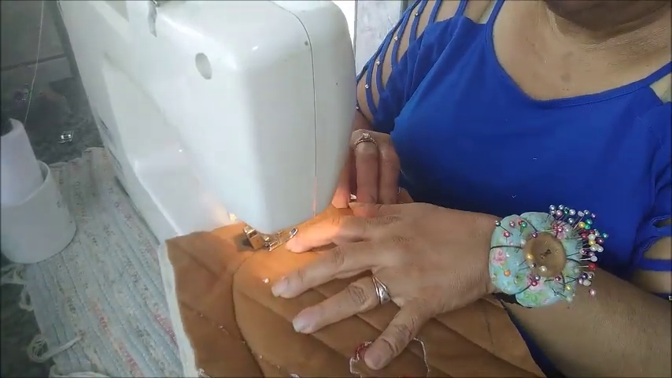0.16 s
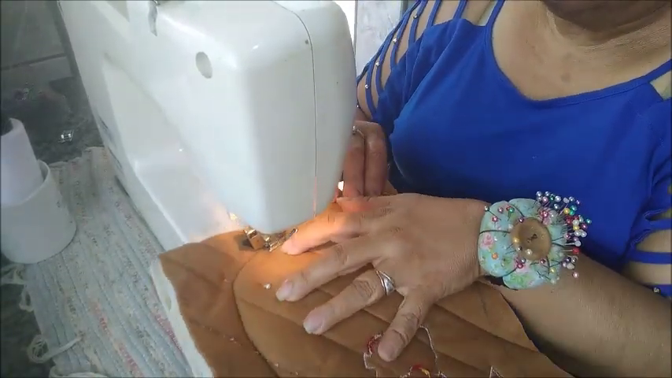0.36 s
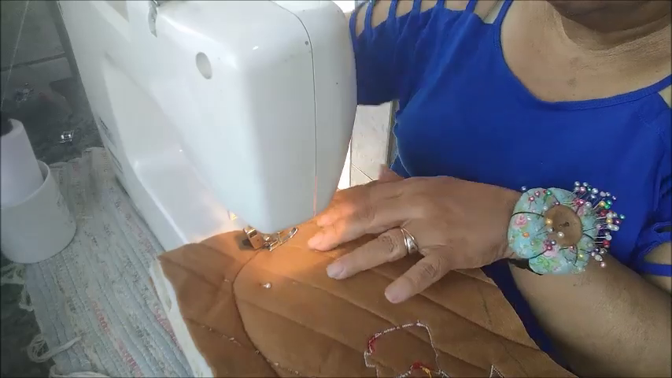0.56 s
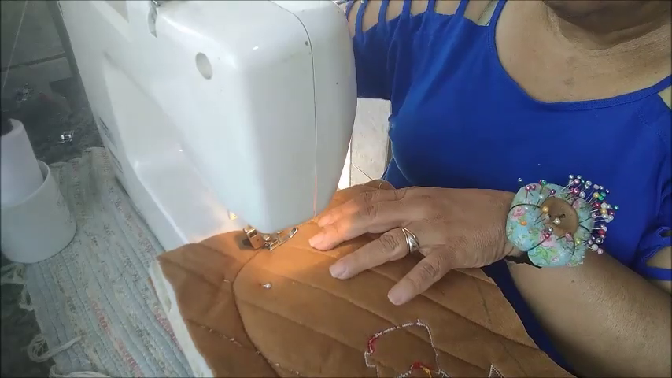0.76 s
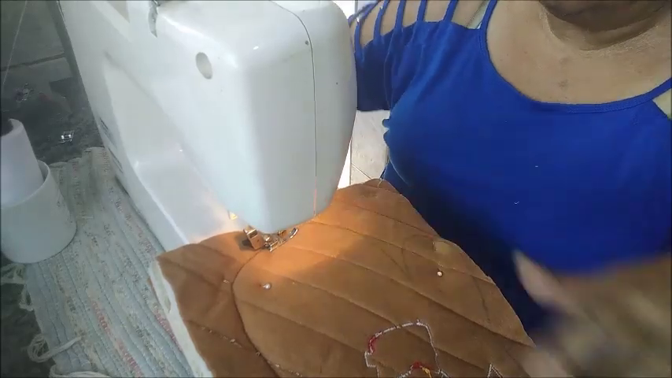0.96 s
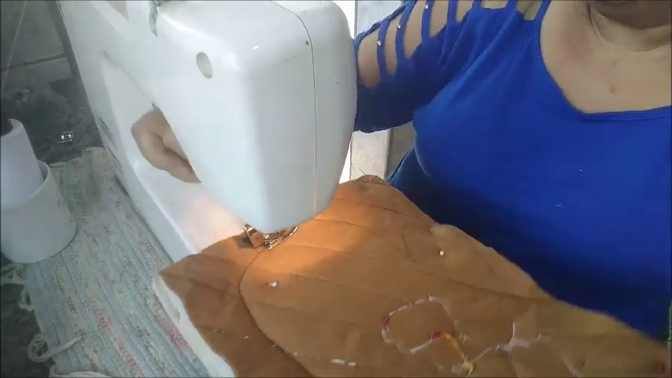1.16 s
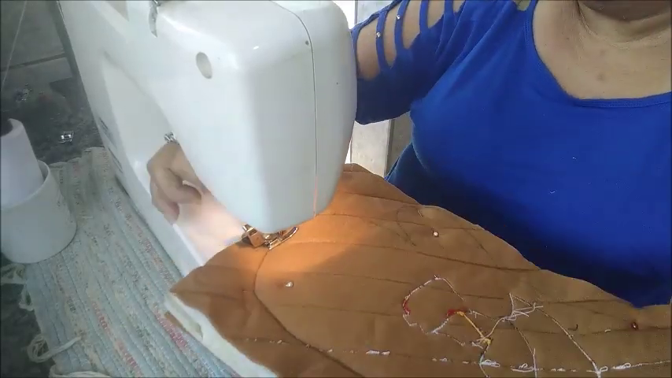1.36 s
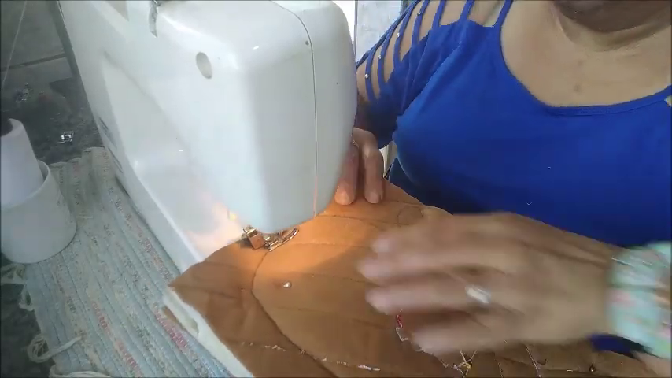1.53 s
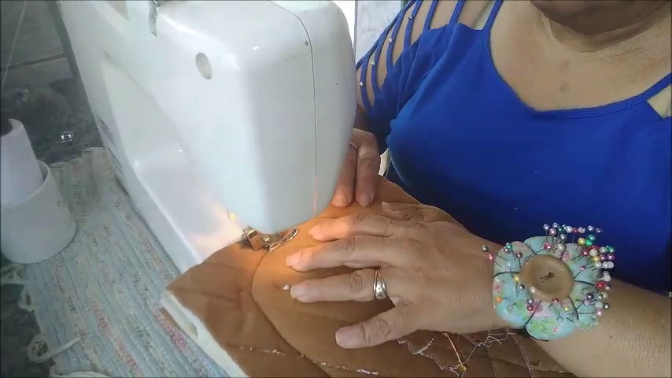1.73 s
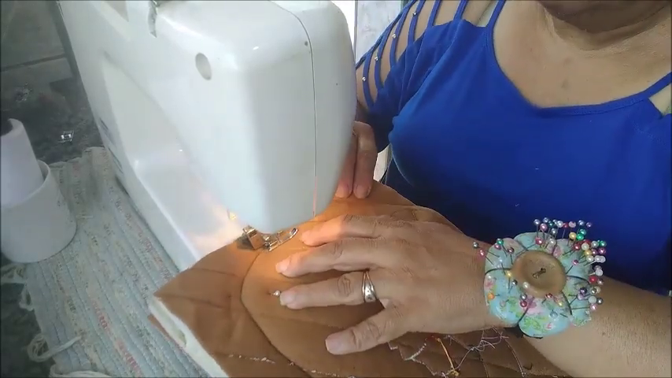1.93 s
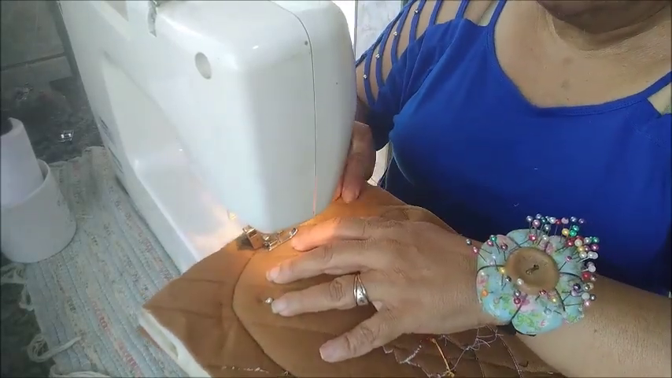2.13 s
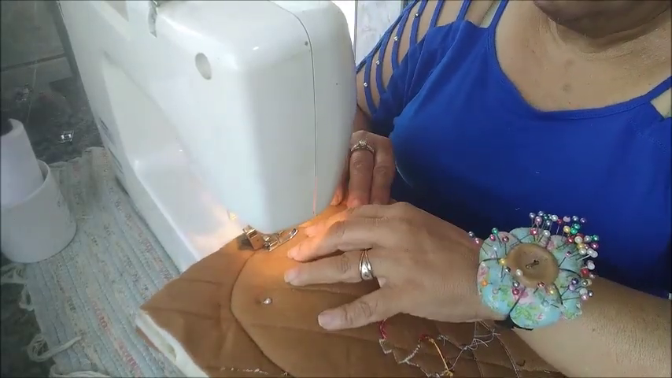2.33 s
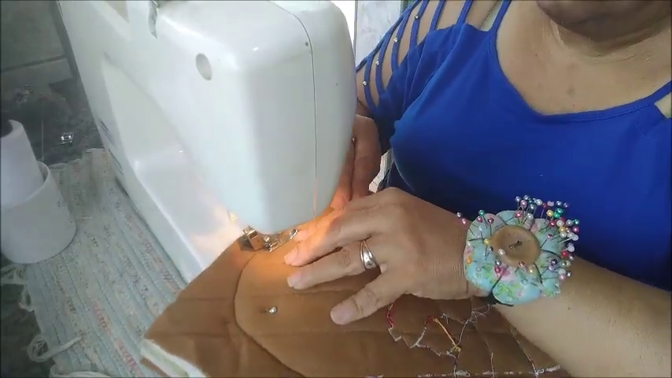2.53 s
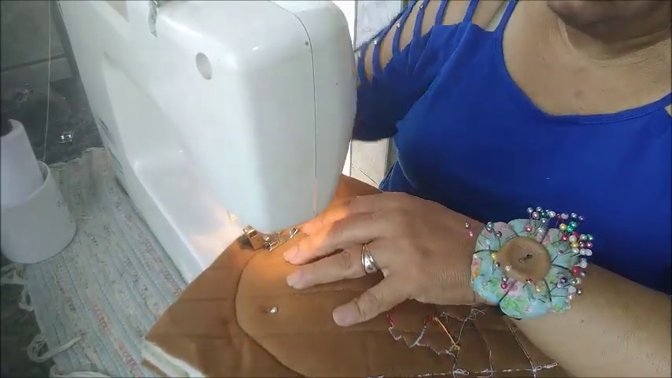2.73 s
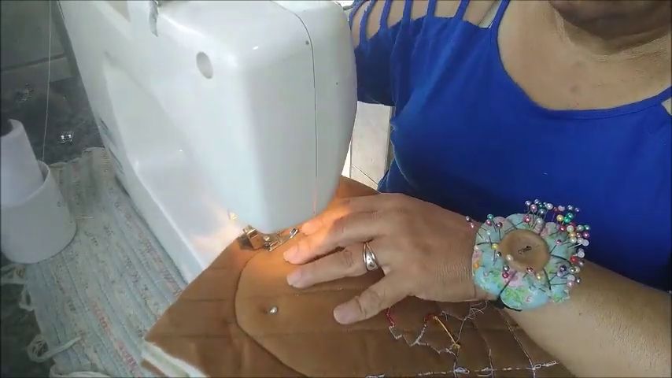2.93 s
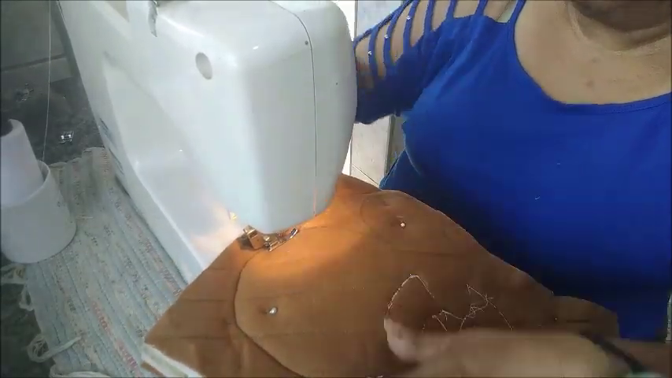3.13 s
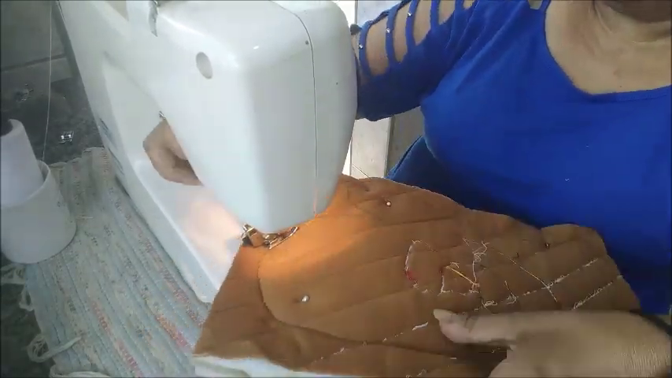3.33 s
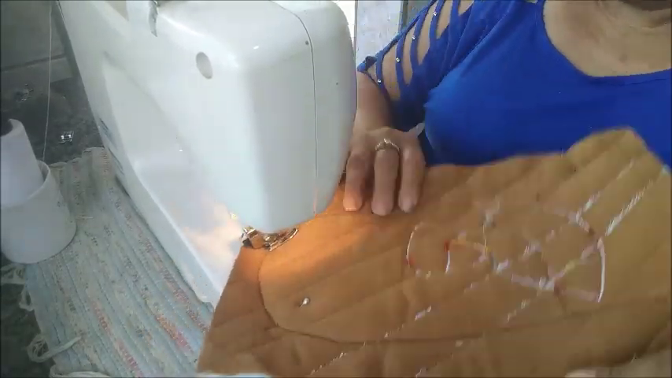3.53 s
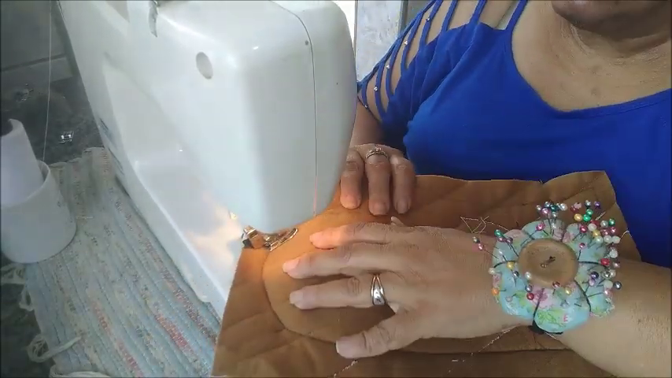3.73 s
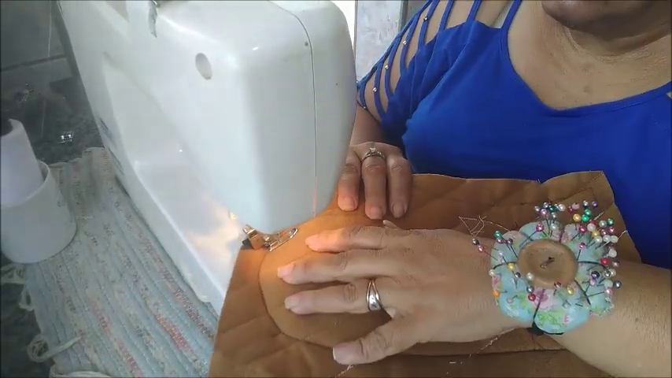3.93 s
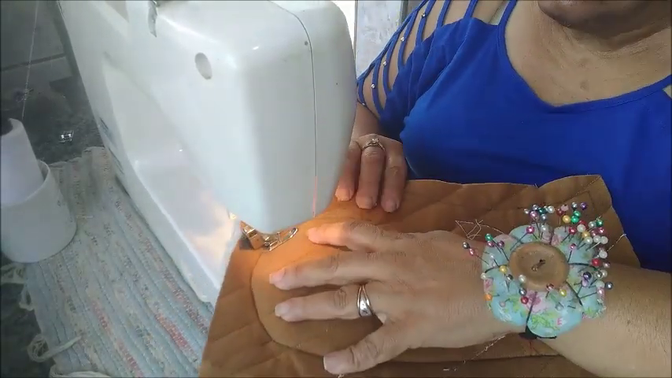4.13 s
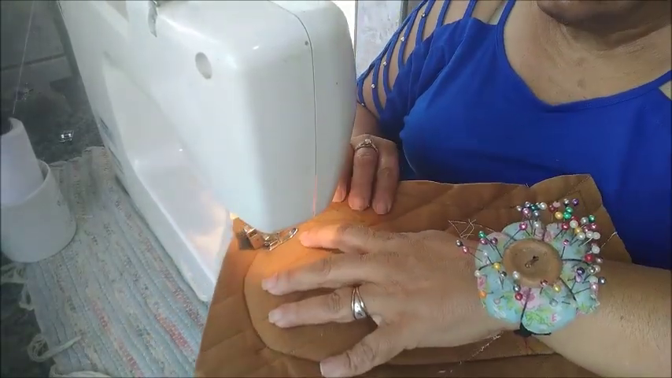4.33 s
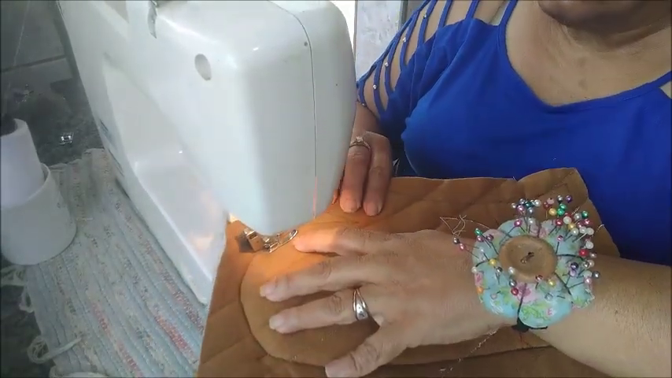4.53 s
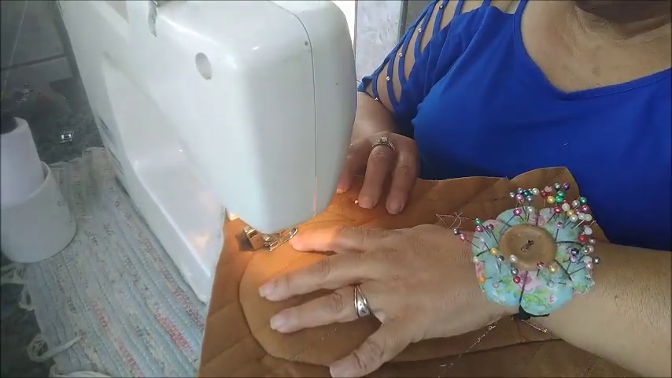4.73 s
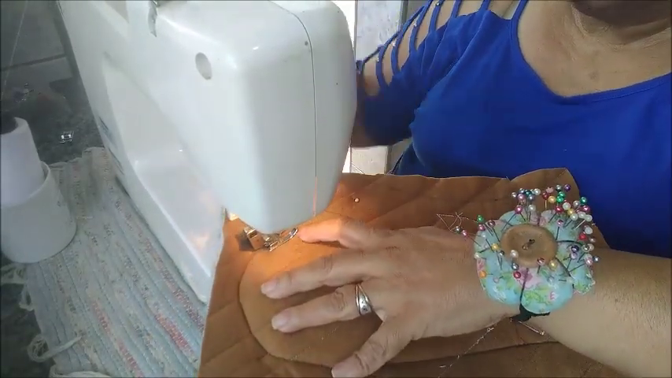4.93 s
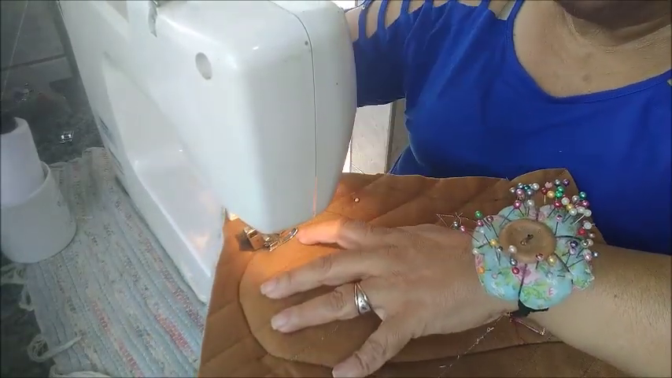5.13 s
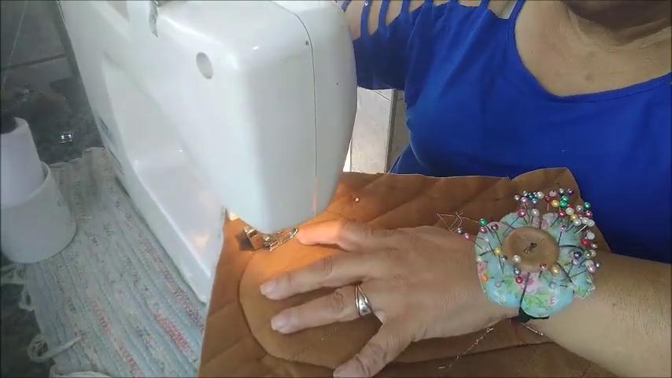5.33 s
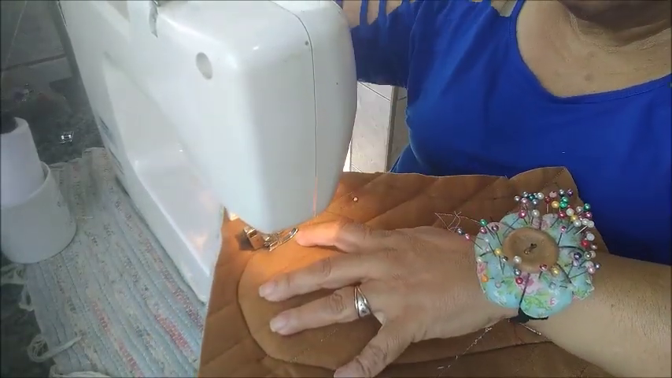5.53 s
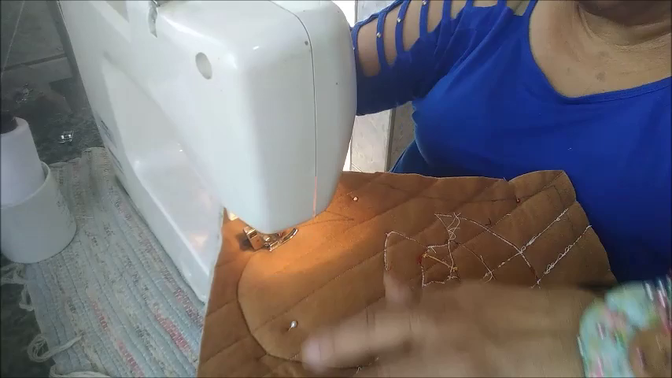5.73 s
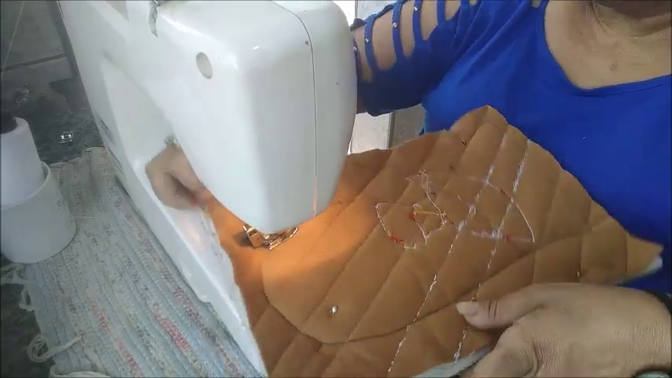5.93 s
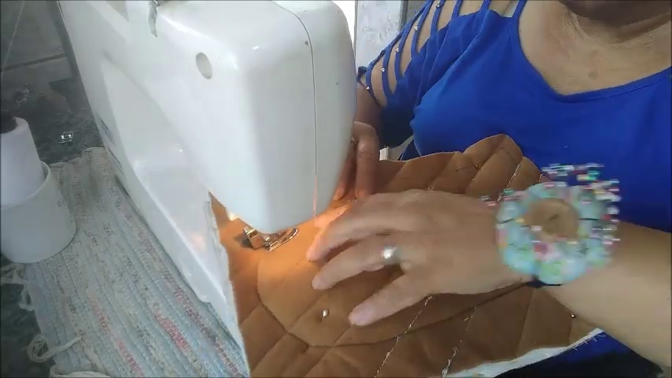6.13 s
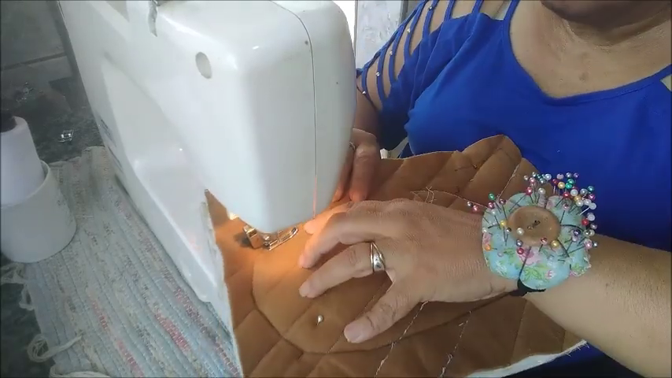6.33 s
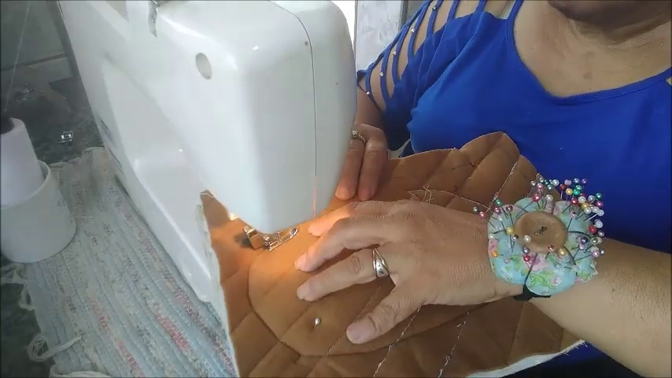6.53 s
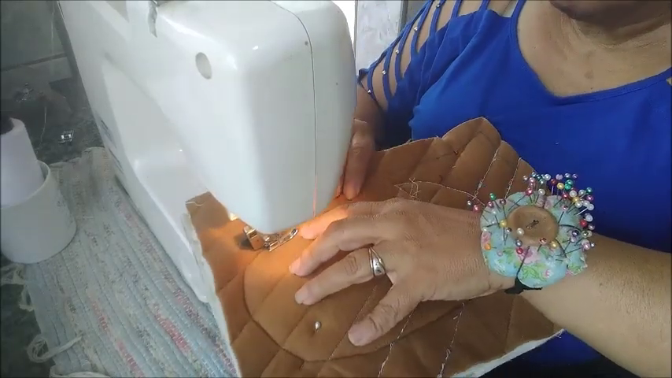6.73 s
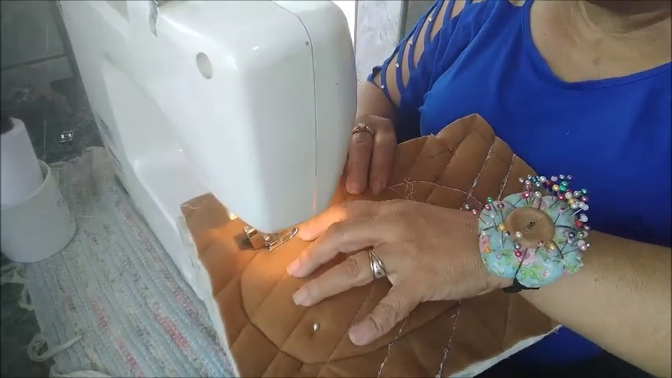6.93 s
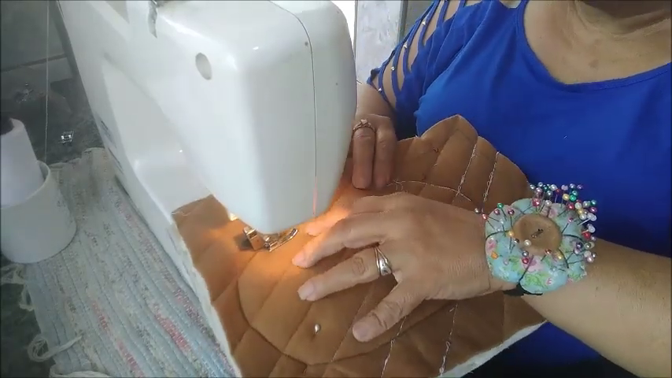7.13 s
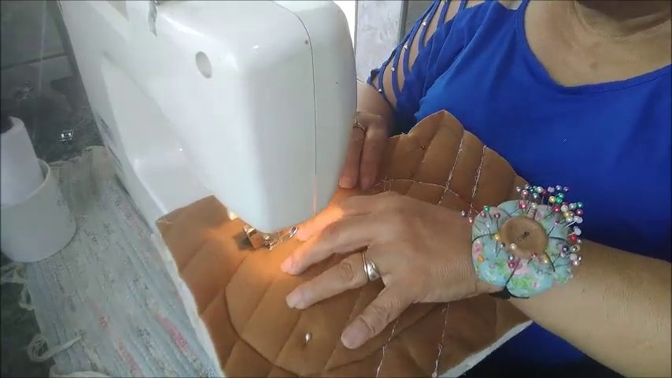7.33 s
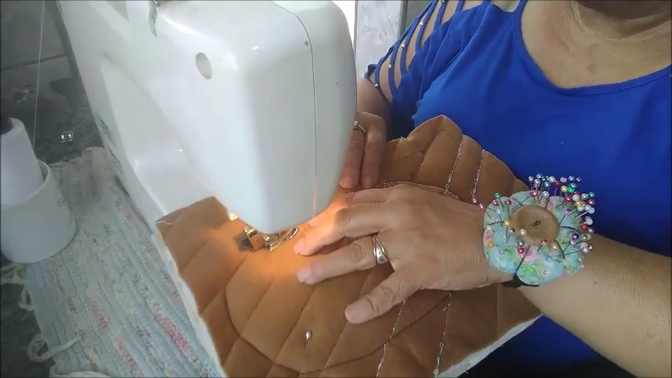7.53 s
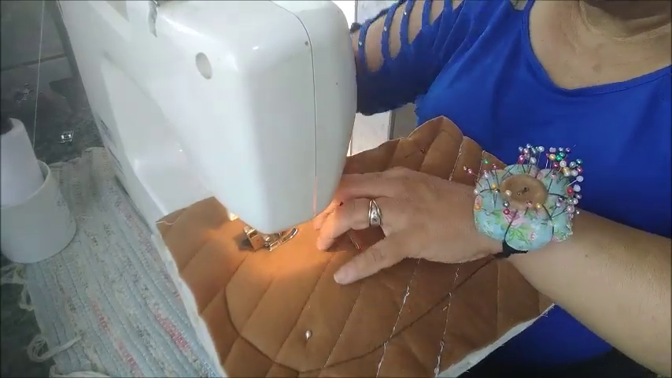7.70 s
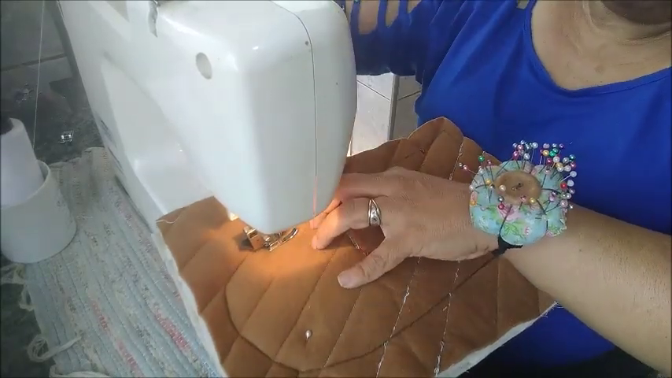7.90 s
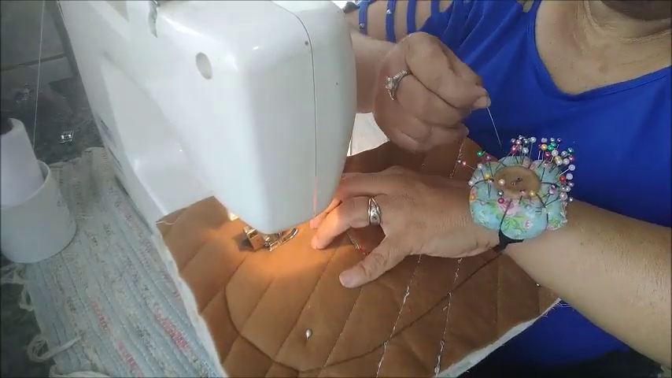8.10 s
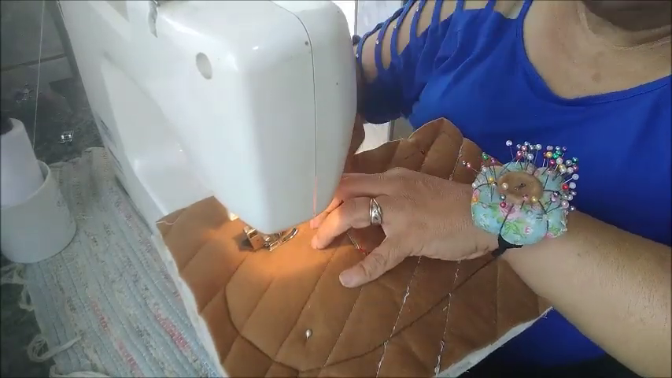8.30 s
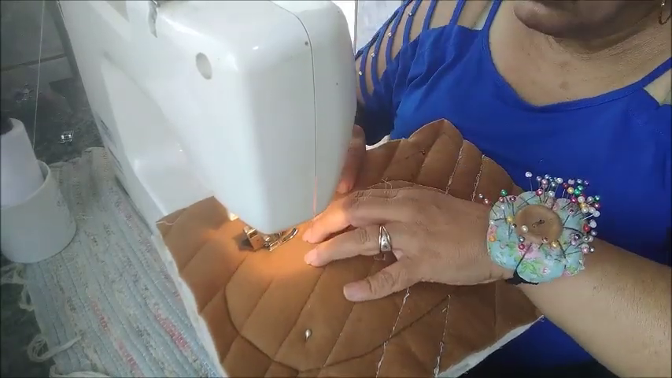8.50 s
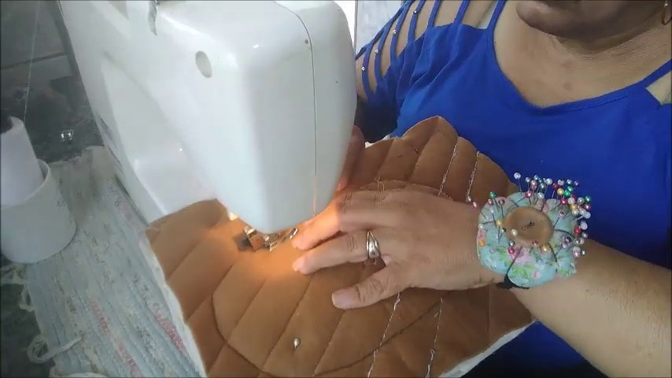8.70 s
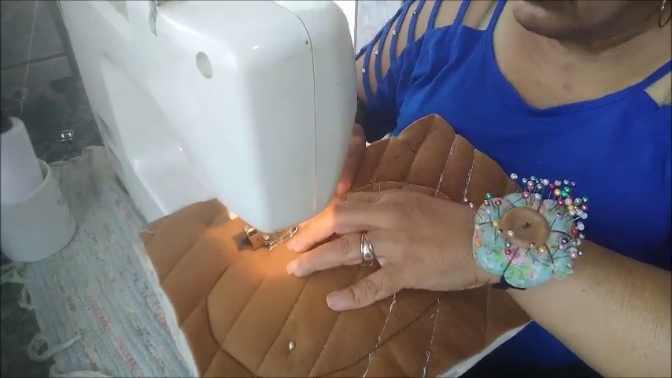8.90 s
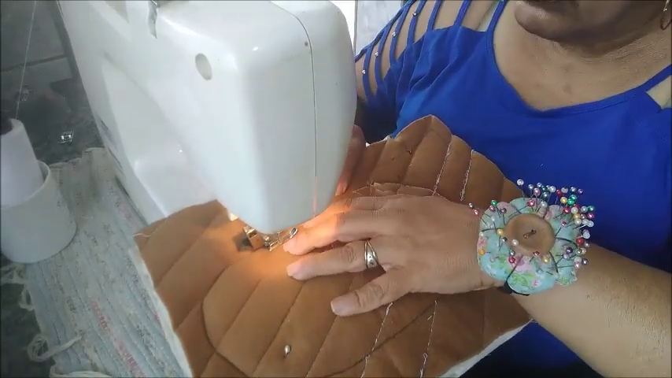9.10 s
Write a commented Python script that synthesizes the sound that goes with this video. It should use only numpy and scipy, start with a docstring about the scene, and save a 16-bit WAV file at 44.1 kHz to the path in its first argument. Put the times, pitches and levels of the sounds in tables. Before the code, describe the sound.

A sewing machine rattles in short, hard bursts through thick quilted fabric, with clicks, soft bumps and cloth rustles between, over faint room hum.

```python
"""A sewing machine on a table stitches a quilt in short bursts, close to a phone.
Room murmur (shaped noise) and thin whines (wavering sines) run throughout; a far low drone sounds until 1.15 s.
One burst at 0.3 s, then groups from 1.8, 3.8, 6.3 and 8.6 s: contact noise and clacks ring housing and table.
Clicks (ticks and ringing knocks) follow the first bursts and return around 5 s; soft bumps ring the table.
Cloth rustles and swishes with faint squeaks (shaped noise, rough tones), mostly between groups from 3.1 s on."""
import sys
import numpy as np
from scipy import signal
from scipy.fft import rfft, irfft, next_fast_len
from scipy.io import wavfile
from scipy.ndimage import uniform_filter1d

SR = 44100
rng = np.random.default_rng(int(sys.argv[2]) if len(sys.argv) > 2 else 0)


def generate_wav(signal):
    """Clip the signal to [-1, 1] and save it as 16-bit WAV at the path in sys.argv[1]."""
    frames = np.transpose(np.atleast_2d(signal))
    scaled = np.clip(frames, -1, 1) * 32767
    pcm = np.round(scaled).astype(np.int16)
    wavfile.write(sys.argv[1], SR, pcm)


N = 403955
T = np.arange(N) / SR

# Pedal presses. Each row: start [s], held [s], stops dead after [s], relative rattle at the start [dB],
# relative rattle at running speed [dB], relative table shake [dB], time of one needle stroke [s].
BURSTS = [(.272, 0.096, 0.2, -45.5, -30, -11.5, .369), (1.772, 0.114, 0.18, -41.5, -32.5, -1.5, 1.785),
          (2.039, 0.1206, 0.215, -46.5, -32, -4, 2.133), (2.362, 0.18, 0.23, -54, -31, -8.5, 2.491),
          (3.847, 0.026, 0.035, -52.5, -41.5, 3, 3.85), (3.961, 0.089, 0.17, -45, -30.5, -1, 4.021),
          (4.199, 0.1, 0.21, -46.5, -30, -4.5, 4.235), (4.488, 0.1, 0.16, -43, -31, -3.5, 4.551),
          (6.324, 0.091, 0.16, -47, -29, -4, 6.416), (6.664, .09, 0.15, -41, -32, -6, 6.743),
          (6.931, 0.1, 0.17, -53.5, -30.5, -8, 7.025), (7.191, 0.14, 0.22, -45.5, -30, -7.5, 7.286),
          (8.586, 0.12, 0.22, -45, -30.5, -4.5, 8.672), (8.882, 0.12, 0.19, -46, -30.5, -5, 8.945)]
# Housing panel resonances. Each row: frequency [Hz], width [Hz], relative level [dB].
HOUSING_MODES = [(955, 69, -5.5), (1103, 32.5, -1), (1304.5, 39.3, 1), (1455, 29, -0.5), (1556, 70, 0.5),
                 (1680, 105, -3.5), (2460, 60, -5), (2600, 74, -7), (3135, 270, -5), (3725, 237, -4.5),
                 (3975, 95, -3.5), (4356, 140, -8), (744.5, 34, -12.5)]
# Table resonances. Each row: frequency [Hz], width [Hz], relative level [dB].
TABLE_MODES = [(192, 70, -8.5), (229, 25, 3), (267.5, 62, -0.5), (353, 59.4, 4), (410, 43, 5),
               (470, 60.6, 4)]
# Spectrum of the gear hiss. Each row: frequency [Hz], relative density [dB per Hz].
GEAR_SPECTRUM = [(350, -51), (600, -18), (823, -26.5), (1080, -12.5), (1530, -26.5), (1830, -7.5),
                 (3730, -8.5), (16000, -20.5)]


def undb(db):
    """Decibels to amplitude factor."""
    return 10 ** (np.asarray(db) / 20)


def level(x, db):
    """Scale to an RMS level, taken over all channels."""
    return x * undb(db) / np.sqrt(np.mean(x ** 2))


def noise():
    """Two independent channels of white noise."""
    return rng.standard_normal((2, N))


def highpass(x, order, cut_hz):
    """Butterworth high-pass."""
    return signal.sosfilt(signal.butter(order, cut_hz, "high", fs=SR, output="sos"), x)


def play(rows, column, rest=-120.):
    """One column of a table interpolated over time, at the rest value outside it."""
    rows = np.array(rows)
    out = np.full(N, rest)
    on = (T >= rows[0, 0]) & (T <= rows[-1, 0])
    out[on] = np.interp(T[on], rows[:, 0], rows[:, column])
    return out


def colour(x, points):
    """Shape the spectrum by (Hz, dB) points, linear in log frequency."""
    hz, db = np.transpose(points)
    size = next_fast_len(N)
    log_hz = np.log(np.arange(size // 2 + 1) * SR / size + 1)
    gain = undb(np.interp(log_hz, np.log(hz), db))
    return irfft(rfft(x, size) * gain, size)[..., :N]


def ring(x, modes):
    """Parallel two-pole resonances of alternating sign; rows of Hz, width in Hz, dB."""
    out = 0
    for k, (hz, width_hz, db) in enumerate(modes):
        r = np.exp(-np.pi * width_hz / SR)
        angle = 2 * np.pi * hz / SR
        gain = (-1) ** k * undb(db) * (1 - r) * np.sin(angle)
        out = out + gain * signal.lfilter([1], [1, -2 * r * np.cos(angle), r * r], x)
    return out


def smear(x, ms):
    """Give each impulse an exponential tail."""
    return signal.lfilter([1], [1, -np.exp(-1000 / (ms * SR))], x)


def walk(rate_hz):
    """Random levels joined by ramps, one new level every 1 / rate_hz seconds."""
    k = int(SR / rate_hz)
    return uniform_filter1d(np.repeat(rng.standard_normal(N // k + 1), k), k)[:N]


def blows(rows, db):
    """Impulses of the given levels at the times in the first column."""
    x = np.zeros(N)
    x[(np.array(rows)[:, 0] * SR).astype(int)] = undb(db)
    return x


def pair(mid, side):
    """Left and right from a centre and an unrelated side signal that grows with pitch."""
    # Each row: frequency [Hz], side minus mid [dB].
    width = [(40, -24), (200, -12.5), (700, -11), (1290, -15), (2380, -8), (4400, -2.5), (8120, 0)]
    return mid + colour(side, width) * np.array([[1], [-1]])


def room():
    """Air and far traffic; low and high air swell separately and the low murmur comes in lumps."""
    # Air spectrum. Each row: frequency [Hz], relative density [dB per Hz].
    air_spectrum = [(25, -39), (150, -52), (300, -21), (480, -16), (1250, -18), (1750, -17.5), (2000, -17),
                    (2600, -19.5), (3300, -23), (4900, -31), (16000, -41)]
    # Narrow bands in the air. Each row: frequency [Hz], width [Hz], relative level [dB].
    air_modes = [(1175, 30, -1), (1945, 35, 0), (1992, 30, 1), (2212, 25, -5), (3240, 90, -9)]
    # Resonances of the murmur. Each row: frequency [Hz], width [Hz], relative level [dB].
    murmur_modes = [(250, 48, -3.5), (370, 34.3, 5), (419.3, 60, 3.5), (451.8, 33, 7)]
    air = level(colour(noise(), air_spectrum), -70.5)
    top = highpass(air, 2, 3000)
    low_swell = undb(1.3 * walk(11))
    top_swell = undb(1.5 * walk(4.3) + 1.5 * walk(25))
    swelling_air = (air - top) * low_swell + top * top_swell
    bands = level(ring(undb(3 * walk(6.5)) * noise(), air_modes), -74)
    lumps = undb(4 * walk(22)) * noise()
    murmur = level(ring(lumps, murmur_modes), -72.5)
    rumble = level(colour(lumps, [(20, -10.5), (70, -16.5), (150, -21.0)]), -80.5)
    return pair(*(swelling_air + bands + murmur + rumble))


def tone(hz, db, pan_db):
    """A sine of given RMS level whose pitch wavers slightly; pan is left minus right."""
    phase = 2 * np.pi * np.cumsum(hz * (1 + 0.00052 * walk(4.6))) / SR
    return np.sqrt(2) * np.sin(phase) * undb(db + np.array([[pan_db], [-pan_db]]) / 2)


def whines():
    """Small motors or supplies nearby: wavering sines, one coming and going, and a far low drone."""
    # Each row: frequency [Hz], mean level [dB], left minus right [dB].
    steady_tones = [(1624.6, -66.5, -3), (3250, -81, 0)]
    # A whine that comes and goes. Each row: time [s], mean level [dB].
    fickle_levels = [(0, -83), (.56, -63), (.72, -68), (1.13, -68.5), (1.19, -76), (1.42, -70),
                     (2.3, -72.5), (2.65, -66.5), (3.1, -74), (3.22, -69), (4.9, -66), (5.03, -73),
                     (5.2, -63), (6.15, -70.5), (6.3, -81), (7.6, -72.5), (8.0, -78.5), (8.27, -77),
                     (8.36, -68.5), (9.16, -75)]
    # Each row: time [s], frequency [Hz], level [dB].
    drone_path = [(0.05, 218, -80), (0.316, 204.6, -78.5), (1.15, 214, -85)]
    fickle_hz, fickle_pan_db = 2118.5, -11
    out = sum(tone(hz, db + 2.1 * walk(6.7), pan_db) for hz, db, pan_db in steady_tones)
    out = out + tone(fickle_hz, play(fickle_levels, 1) + 2 * walk(12), fickle_pan_db)
    return out + tone(play(drone_path, 1, rest=140.0), play(drone_path, 2), 0)


def bumps():
    """Hands and quilt on the table: soft noise pushes ring its upper modes."""
    # Each row: time [s], relative level [dB].
    pushes = [(0.492, -54.5), (2.762, -60.5), (2.815, -50), (3.899, -56), (4.711, -56), (8.399, -56.5),
              (4.867, -55.5), (4.929, -53.5)]
    push = smear(smear(blows(pushes, np.array(pushes)[:, 1]), 5.7), 6.5) * noise()
    return undb(-19) * highpass(ring(push, TABLE_MODES[3:6]), 2, 250)


def rustles():
    """Quilt rustling: grainy noise in narrow bands, each patch swelling and fading."""
    # Each row: start [s], length [s], centre frequency [Hz], level before the swell [dB].
    patches = [(3.138, 0.41, 2440, -71), (8.11, 0.14, 4470, -80), (8.32, 0.32, 2560, -75),
               (8.33, 0.054, 4400, -76)]
    out, grain = 0, undb(8.8 * walk(60)) * noise()
    for start, length, hz, db in patches:
        sos = signal.butter(2, [hz / 1.15, hz * 1.15], "band", fs=SR, output="sos")
        arch = np.sin(np.pi * np.clip((T - start) / length, 0, 1))
        out = out + level(signal.sosfilt(sos, grain), db) * np.sqrt(np.abs(arch))
    return out


def swishes():
    """Quilt being shifted: cloth slides with a grainy hiss; a thin rough squeak arches over it."""
    # Each row: start [s], length [s], top squeak frequency [Hz], relative squeak level [dB],
    # relative level of its octave [dB], swish level at its height [dB].
    slides = [(3.2, 0.16, 6850, -77, -75, -79), (3.836, 0.074, 6910, -64, -60, -74),
              (5.218, 0.19, 6600, -90, -77, -69.5), (5.936, 0.15, 7060, -76, -97, -77),
              (7.693, 0.17, 6500, -93, -78, -84)]
    # Each row: frequency [Hz], relative density [dB per Hz].
    cloth_spectrum = [(1500, -9), (2800, 4), (6000, -4), (16000, -2.5)]
    squeak_arch, squeak_width_hz = 0.04, 190  # arch: share of the top pitch
    hiss = level(colour(undb(2.4 * walk(90)) * noise(), cloth_spectrum), 0)
    rough = level(uniform_filter1d(noise(), size=int(SR / squeak_width_hz)), 0)
    out = 0
    for start, length, hz, squeak_db, octave_db, swish_db in slides:
        arch = np.sin(np.pi * np.clip((T - start) / length, 0, 1))
        phase = 2 * np.pi * np.cumsum(hz * (1 + squeak_arch * (arch - 1))) / SR
        squeak = rough * (undb(squeak_db) * np.sin(phase) + undb(octave_db) * np.sin(2 * phase))
        out = out + np.sqrt(np.abs(arch)) * (squeak + undb(swish_db) * hiss)
    return out


def clicks():
    """Lever, wheel and pin while the machine rests: a coloured noise tick and a housing knock."""
    # Each row: time [s], relative tick level [dB], knock drive over the tick [dB], tick colour [Hz].
    ticks = [(0.671, -49, -2, 5000), (0.753, -39, -8, 4200), (0.7674, -41.5, -21, 6300),
             (0.786, -46, -18, 6200), (0.864, -46.5, -2, 2900), (0.895, -49, -6, 6500),
             (0.92, -40.5, -14, 3800), (1.1827, -49, -7, 6960), (2.8376, -22.5, 0.5, 5800),
             (2.854, -26.5, 0, 3770), (2.9072, -31.5, -39, 4400), (3.294, -46.5, -10, 7000),
             (5.056, -65.5, 14, 3000), (5.258, -42.5, 1, 4160), (5.3372, -58, 9, 3200),
             (5.376, -39, -26, 4360), (5.386, -37.5, -27, 3600), (5.443, -39, 1, 4060),
             (5.502, -36.5, -17, 3880), (5.5594, -40, 0, 4230), (5.706, -47.5, -25, 3050),
             (5.88, -42.5, -15, 7740), (7.115, -27, -37, 3770)]
    t = np.arange(1500) / SR
    shape = np.exp(-t / .004) - np.exp(-t / .0002)
    bright = np.zeros((2, N))
    for s, tick_db, _, hz in ticks:
        band = signal.butter(1, [hz / 1.5, min(hz * 1.5, 19000)], "band", fs=SR, output="sos")
        tick = signal.sosfilt(band, shape * rng.standard_normal((2, len(t))))
        bright[:, int(s * SR):][:, :len(t)] += undb(tick_db) * tick
    damped_modes = np.array(HOUSING_MODES[:7]) * [1, 2.1, 1]  # widths grow
    knock_db = np.array(ticks)[:, 1] + np.array(ticks)[:, 2]
    knock = ring(smear(blows(ticks, knock_db), 1.8) * noise(), damped_modes)
    return undb(-6) * bright + undb(23) * highpass(knock, 2, 800)


def pedal():
    """Effort and shake in dB: the motor spins up while held, brakes evenly, then stops dead."""
    full_db, db_per_decade = -30, 49  # relative rattle at full speed; its rise with speed
    spin_up_s, brake_per_s = .04, 7.8  # brake in shares of full speed
    least_speed = .05  # share of full speed while the shaft turns
    effort_db, shake_db = np.full(N, -120.), np.zeros(N)
    for start, held, stop, first_db, running_db, shake, _ in BURSTS:
        t = T - start
        first, running = 10 ** ((np.array([first_db, running_db]) - full_db) / db_per_decade)
        spin_up = running - (running - first) * np.exp(-np.clip(t, 0, held) / spin_up_s)
        speed = spin_up - brake_per_s * np.maximum(t - held, 0)
        on = (t >= 0) & (t < stop)
        effort_db[on] = full_db + db_per_decade * np.log10(np.maximum(speed[on], least_speed))
        shake_db[on] = shake
    return effort_db, shake_db


def strokes():
    """Gain that jumps at every needle stroke, each of its own strength, and fades."""
    cycle_s, fade_s, stroke_db, uneven_db = .0178, 0.0046, -5, 3
    rows = np.array(BURSTS)
    beats = (rows[:, 6:] + cycle_s * np.arange(-8, 8)).clip(0, None)
    starts = rows[:, :1]
    stops = starts + rows[:, 2:3]
    strength_db = stroke_db + uneven_db * rng.standard_normal(beats.shape)
    db = np.where((beats > starts) & (beats < stops), strength_db, -120)
    kicks = np.zeros(N)
    np.add.at(kicks, (beats * SR).astype(int), undb(db))
    return 1 + smear(kicks, 1000 * fade_s)


def scraping():
    """Dense uneven contacts of one group of parts, each a short scrape, over a steady rub."""
    hits = rng.random(N) < 700 / SR  # 700 per second on average
    contacts = hits * undb(np.minimum(4 * rng.exponential(size=N), 8))
    return (level(smear(contacts, .6), 0) + .6) * noise()


def panels():
    """Each housing panel is rubbed harder and softer in turn, so the strongest ring wanders."""
    rub = scraping()
    out = 0
    for k, mode in enumerate(HOUSING_MODES):
        out = out + ring((-1) ** k * undb(2.13 * walk(14)) * rub, [mode])
    return out


def motor_whir(effort_db, drive):
    """A rough tone climbs with speed and sweeps through the housing's resonances."""
    target_hz = np.clip(1600 + 35 * (effort_db + 31), 1200, 1750)
    whir_hz = signal.lfilter([.0015], [1, -.9985], target_hz)
    wobble = uniform_filter1d(noise(), size=170)
    whir = level(wobble * np.sin(2 * np.pi * np.cumsum(whir_hz) / SR), 0.4)
    return ring(drive * whir, HOUSING_MODES)


def table_thump(effort_db, shake_db):
    """The table shakes mainly near full speed, so its level swings further than the rattle."""
    push = undb(1.53 * (effort_db + 29.0) + shake_db) * scraping()
    low = colour(push, [(20, -61), (90, -53.5), (200, -60.5), (400, -108)])
    return undb(-17.0) * ring(push, TABLE_MODES) + low


def clacks():
    """Hard needle-bar hits, and a jolt taking up the slack at each start, ring the housing."""
    # Each row: time [s], relative level [dB].
    needle_hits = [(0.3689, -18), (2.133, -8), (2.386, -22), (2.528, -5), (4.2359, -7), (6.342, -17),
                   (6.743, -0.5), (7.27, -6), (7.398, -15)]
    jolt_db = 25.5  # over the rattle at the start
    needle = blows(needle_hits, np.array(needle_hits)[:, 1])
    jolts = blows(BURSTS, np.array(BURSTS)[:, 3] + jolt_db)
    hit = smear(needle + jolts, 0.83) * noise()
    return undb(6.0) * ring(hit, HOUSING_MODES[2:11]) + undb(-11.5) * colour(hit, GEAR_SPECTRUM)


def machine():
    """Needle bar, hook and feed dogs rattle housing and table; the motor whirs and gears hiss."""
    effort_db, shake_db = pedal()
    effort = undb(effort_db)
    # the parts coast for a moment after the stop
    coasting = np.maximum(effort, undb(-85) * smear(effort, 21.0))
    drive = uniform_filter1d(coasting, size=200) * strokes() * undb(-1.5)
    rattle = drive * level(panels(), -5.0)
    hiss = drive * level(colour(scraping(), GEAR_SPECTRUM), -4)
    whir = motor_whir(effort_db, drive)
    return rattle + whir + table_thump(effort_db, shake_db) + hiss + clacks()


def scene():
    """Near sources with a short diffuse tail from the walls, over whines and room."""
    near = bumps() + rustles() + swishes() + clicks() + machine()
    tail_n, decay_s = 4000, 0.012
    tail = rng.standard_normal((2, tail_n)) * np.exp(-np.arange(tail_n) / SR / decay_s)
    wet = signal.fftconvolve(near, tail, axes=1)[:, :N]
    return room() + whines() + pair(*(near + undb(-29.5) * wet))


def record(dry):
    """The phone cuts the top with a steep elliptic low-pass."""
    top_hz = 15900
    return signal.sosfilt(signal.ellip(10, .2, 70, top_hz, fs=SR, output="sos"), dry)


dry = scene()
out = record(dry)
generate_wav(out)
```